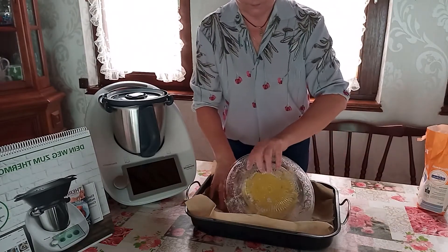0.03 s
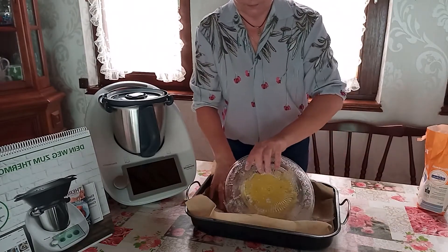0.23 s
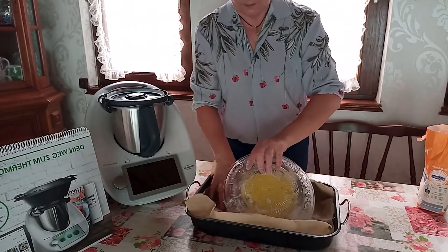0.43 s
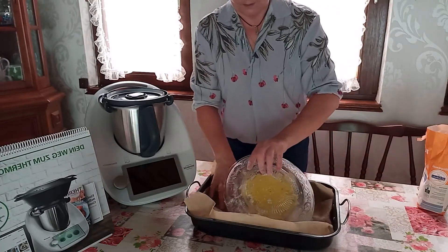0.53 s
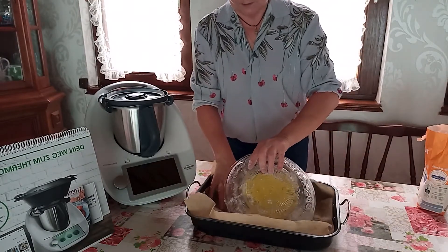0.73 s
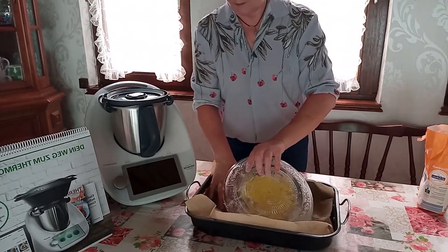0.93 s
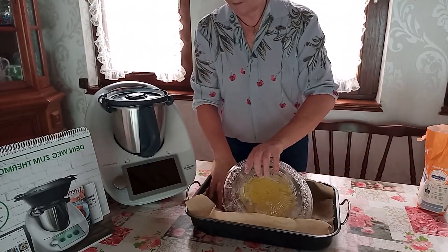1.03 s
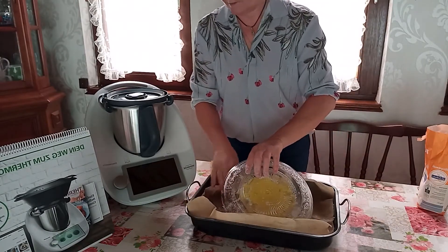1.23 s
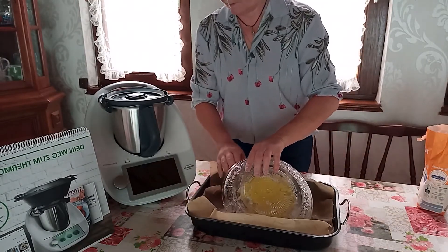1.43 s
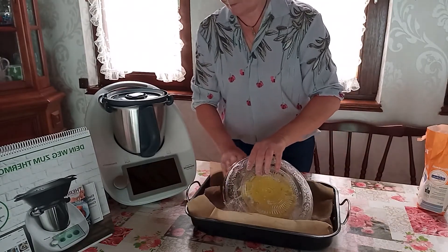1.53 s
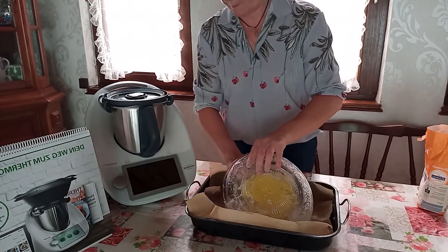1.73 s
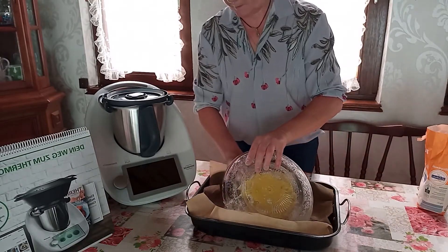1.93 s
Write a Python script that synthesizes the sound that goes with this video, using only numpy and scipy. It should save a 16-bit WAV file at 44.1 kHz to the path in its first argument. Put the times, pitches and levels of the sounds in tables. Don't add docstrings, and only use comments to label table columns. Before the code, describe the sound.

Stiff parchment is shoved and creased in a metal baking tray, loud at first, dying away into light, separate rustles and ticks, with soft low tray nudges, short room echoes and faint appliance hum.

```python
import sys
import numpy as np
from scipy import signal
from scipy.io import wavfile

SR = 44100
rng = np.random.default_rng(int(sys.argv[2]) if len(sys.argv) > 2 else 0)


def transcribe(signal):
    frames = np.atleast_2d(signal).T
    limited = np.clip(frames, -1, 1)
    pcm = np.round(limited * 32767).astype(np.int16)
    wavfile.write(sys.argv[1], SR, pcm)


def volts_from_decibels(level):
    exponent = np.asarray(level, float) / 20
    return 10 ** exponent


N = 88200


def rms_one(x):
    return x / np.sqrt(np.mean(x ** 2) + 1e-20)


def at_hz(points, hz):
    table_hz, value = np.array(points).T
    return np.interp(np.log(hz), np.log(table_hz), value)


def drift(rate_hz):
    r = np.exp(-80 * np.pi * rate_hz / SR)
    noise = rng.standard_normal(N // 40 + 2002)
    slow = signal.lfilter([1], [1, -2 * r, r * r], noise)[2000:]
    return np.interp(np.arange(N) / 40, np.arange(len(slow)), rms_one(slow))


def resonance(x, hz, width_hz):
    r = np.exp(-np.pi * width_hz / SR)
    poles = [1, -2 * r * np.cos(2 * np.pi * hz / SR), r * r]
    return signal.lfilter([(1 - r * r) / 2, 0, (r * r - 1) / 2], poles, x)


def filtered(x, order, hz, kind):
    return signal.sosfilt(signal.butter(order, hz, kind, fs=SR, output="sos"), x)


# (frequency [Hz], left-right correlation)
LIKENESS = [(30, -0.36), (300, 0.7), (1000, 0.47), (2500, 0.15), (6000, -0.19), (14000, 0.067)]
# (frequency [Hz], left minus right [dB])
BALANCE_LR = [(60, 2.5), (380, -2), (2380, -1), (15000, 0.5)]
WEIGHT_BELOW_HZ, CRISP_ABOVE_HZ = 1780, 6100


def bands(source, spectrum, patch_db, weight_db, crisp_db):
    out = 0
    edges_hz = 26 * 2 ** np.arange(0, 9.6, .5)
    for k, (low, high) in enumerate(zip(edges_hz, edges_hz[1:])):
        mid, side = filtered(source[k % 2], 2, [low, high], "band")
        hz = np.sqrt(low * high)
        alike = np.clip(at_hz(LIKENESS, hz), -.9, .99)
        touch_db = weight_db / (1 + (hz / WEIGHT_BELOW_HZ) ** 4)
        touch_db = touch_db + crisp_db / (1 + (CRISP_ABOVE_HZ / hz) ** 4)
        gain = volts_from_decibels(at_hz(spectrum, hz) + patch_db * drift(7.2) + touch_db)
        lean = volts_from_decibels(at_hz(BALANCE_LR, hz) / 2 * np.array([[1], [-1]]))
        stereo = np.sqrt(1 + alike) * mid + np.sqrt(1 - alike) * side * [[1], [-1]]
        out = out + gain * lean * stereo
    return out


CREASES_PER_S, CREASE_SPREAD_DB, CLUMP_DB = 9700, 2.7, 0.47


def creases():
    born = rng.random((2, 2, N)) < CREASES_PER_S / SR
    size_db = CREASE_SPREAD_DB * np.minimum(rng.exponential(1, (2, 2, N)), 5)
    sizes = volts_from_decibels(size_db) * rng.choice([-1, 1], (2, 2, N))
    return rms_one(born * sizes) * volts_from_decibels(CLUMP_DB * (drift(24.5) + drift(160)))


# (time [s], force level [dB], weight on tray [dB], crispness [dB])
PUSHES = [
    [(0.0, -72, 0, -19), (0.04, -79.5, -5, -4), (0.088, -51.5, -10.5, -10.5), (0.13, -43.5, -10, -3.5),
     (0.158, -40, -3, -1), (0.18, -42.5, -1.5, -5.5), (0.195, -41.5, -2, -3.5), (0.235, -46, -2, -2),
     (0.27, -59, -3.5, -6)],
    [(0.308, -52.5, -6.5, -12), (0.316, -44, -4.5, -7), (0.328, -39, -9, -2.5), (0.356, -36, -2.5, -3),
     (0.385, -39.5, -9, -8), (0.41, -40, -3, 0), (0.44, -40, -6.5, -6), (0.466, -49, -4.5, -4)],
    [(0.485, -45, -7, -2), (0.497, -45, -3.5, 3.5), (0.522, -37, -7, -3.5), (0.552, -46.5, -5, -5.5),
     (0.572, -41, -3.5, -5.5), (0.595, -41.5, -7.5, -1.5), (0.615, -49.5, -1.5, -3), (0.64, -53, 0, -9)],
    [(0.655, -46, -3.5, -4), (0.668, -38.5, -7, -3.5), (0.7, -39, -4, -3.5), (0.722, -42, -1.5, -4.5),
     (0.752, -38, -5.5, -4.5), (0.79, -44.5, -4, -3.5), (0.828, -55, -2, -8)],
    [(0.865, -47.5, -3, -3.5), (0.885, -51, -6.5, -6.5), (0.916, -61.5, 1, -3), (0.96, -60, -5.5, -3),
     (1.02, -60, -1.5, -3), (1.06, -65, -1, -5), (1.104, -66.5, -7, -0.5), (1.16, -64, -6.5, -1),
     (1.19, -63.5, -7.5, -8)],
]
# (time [s], force level [dB], weight on tray [dB], crispness [dB])
TUGS = [
    [(1.2, -63.5, -8, -2), (1.206, -59.5, -11, -4.5), (1.243, -60, -4, -7), (1.255, -53, -11, 1),
     (1.29, -59, -11, -1), (1.325, -61, -7.5, -7.5), (1.352, -77, -20, -4), (1.38, -69.5, -23, 2.5),
     (1.414, -69, -4.5, 0.5)],
    [(1.49, -82.5, -13, -3), (1.52, -71.5, -9, 3.5), (1.55, -57.5, -6.5, -11.5), (1.604, -59.5, -5.5, -9),
     (1.638, -55.5, -10, -12), (1.672, -58, -4, -4), (1.703, -66, -11, -13)],
    [(1.712, -60.5, -10, 0), (1.75, -61.5, -16, -5), (1.762, -67, -20, -5), (1.8, -73.5, -25, -2),
     (1.836, -71, -20, -10)],
    [(1.842, -73, -12, -12), (1.866, -59.5, -10, -11), (1.885, -69, -14, -9), (1.91, -71, -8, -9),
     (1.924, -67, -4, -12), (1.954, -63, -15, -12), (1.968, -56, -6, -7), (2.0, -51.5, -16, -11)],
]
# (frequency [Hz], density [dB per Hz])
PAPER = [(60, -17), (280, -6.5), (799, -5.5), (1500, -7.5), (2300, 0.5), (4400, -2.5), (6510, -5.5),
         (12200, -5.5), (15800, -9)]
# (frequency [Hz], width [Hz], level [dB])
BODY = [(602, 73, -5), (816, 230, -8.5), (1140, 356, -7.5), (1580, 26, -50), (2180, 130, -13),
        (5060, 230, -10.5), (12070, 800, -18.5)]
RUSTLE_DB, PATCH_DB = 5.5, 1.0
USUAL_WEIGHT_DB, USUAL_CRISP_DB = -5.5, -3.5


def rustle():
    s, *controls = np.concatenate(PUSHES + TUGS).T
    force_db, weight_db, crisp_db = [np.interp(np.arange(N) / SR, s, c) for c in controls]
    extra_weight_db = np.minimum(weight_db - USUAL_WEIGHT_DB, 5)
    x = bands(creases(), PAPER, PATCH_DB, extra_weight_db, crisp_db - USUAL_CRISP_DB)
    x = x + sum(2 * volts_from_decibels(db) * resonance(x, hz, width_hz) for hz, width_hz, db in BODY)
    level = np.sqrt(volts_from_decibels(force_db + RUSTLE_DB) ** 2 + pop_tail_power())
    return level * rms_one(x)


# (time [s], peak level [dB], pitch [Hz], after-rustle
# [dB])
POPS = [(0.03, -56, 6100, -7), (.084, -35.5, 4520, -9.5), (.163, -32, 790, -26), (.315, -34, 1200, -18),
        (.327, -24, 790, -13.5), (.35, -26.5, 394, -19), (0.356, -26, 1710, -24), (.405, -26, 1200, -33),
        (0.482, -33, 1300, -17), (0.526, -22, 1300, -15), (.566, -31, 734, -20), (0.665, -28, 830, -23),
        (0.689, -26, 1000, -16), (0.741, -29, 2500, -25), (.77, -35, 222, -13.5), (0.844, -41, 315, -10),
        (0.881, -45, 1500, -25), (.995, -43.5, 1150, -8.5), (1.068, -43.5, 910, -14),
        (1.205, -40, 3450, -21), (1.247, -34.5, 4440, -27), (1.255, -33.5, 4650, -17),
        (1.275, -47.5, 680, -6), (1.290, -38.5, 2800, -14), (1.362, -50, 2700, -10),
        (1.374, -47.5, 3000, -8.5), (1.498, -60, 6000, -7), (1.516, -57, 2150, -13), (1.535, -50, 590, -5),
        (1.632, -36, 5400, -14), (1.633, -41, 3900, -13), (1.638, -47, 6000, -20),
        (1.709, -43, 5200, -13.5), (1.710, -49.5, 860, -16), (1.840, -38.5, 5130, -15),
        (1.915, -48, 1290, -11.5), (1.965, -40.5, 2660, -8.5), (1.974, -44, 3300, -17),
        (.145, -33, 4600, -12), (.19, -34, 4400, -13), (.226, -34, 2200, -15), (.39, -27, 4300, -14),
        (.42, -35, 280, -13), (0.676, -32, 3800, -14)]
POP_DB, POP_TICK_DB, POP_BURST_S, POP_WIDTH = -3, -16, .006, .45
TUNED_TAIL_DB, TUNED_TAIL_S, TUNED_TAIL_WIDTH = -3.5, 0.14, 0.34
BROAD_TAIL_DB, POP_TAIL_S = -3, 0.055


def pops():
    out = np.zeros((2, N + SR))
    t = np.arange(6000) / SR
    noise = rng.standard_normal((len(POPS), 3, len(t)))
    for (s, db, hz, after_db), (snap, *fizz) in zip(POPS, noise):
        crack = volts_from_decibels(-60 * t / POP_BURST_S) * snap
        ring = resonance(crack, hz, POP_WIDTH * hz)
        tick = volts_from_decibels(POP_TICK_DB) * np.diff(crack, prepend=0)
        pop = volts_from_decibels(POP_DB) * (ring / np.abs(ring).max() + tick)
        tuned = rms_one(resonance(np.array(fizz), hz, TUNED_TAIL_WIDTH * hz))
        tail = volts_from_decibels(after_db + TUNED_TAIL_DB - 60 * t / TUNED_TAIL_S) * tuned
        start = int(s * SR)
        out[:, start:start + len(t)] += volts_from_decibels(db) * (tail + pop)
    return out[:, :N]


def pop_tail_power():
    t = np.arange(N) / SR
    power = 0
    for s, db, _, after_db in POPS:
        fall_db = 60 * np.maximum(t - s, 0) / (3 * POP_TAIL_S)
        power = power + volts_from_decibels(db + after_db + BROAD_TAIL_DB - fall_db) ** 2 * (t >= s)
    return power


# (time [s], peak level [dB], pitch [Hz], swell [s])
NUDGES = [(0.032, -71, 54, 0.025), (.2, -62, 98, 0.02), (0.259, -64, 52, 0.022), (.28, -67, 134, 0.032),
          (.325, -69, 90, 0.017), (0.358, -56, 160, 0.023), (0.411, -65.5, 101, 0.036),
          (0.457, -57, 137, 0.034), (0.561, -62.5, 139, 0.078), (.59, -61, 58, .018),
          (.65, -65.5, 86, 0.022), (0.72, -63, 96, 0.018), (.78, -67, 120, .02), (.81, -63, 55, 0.02),
          (.87, -71, 125, .03), (1.005, -74, 130, .015), (.89, -67, 52, 0.018), (1.04, -73, 80, .015),
          (1.32, -73, 70.4, 0.025), (1.8, -76, 48, 0.046)]


def nudges():
    t = np.arange(N) / SR
    out = 0
    for s, db, hz, swell_s in NUDGES:
        out = out + volts_from_decibels(db) * np.exp(-((t - s) / swell_s) ** 2) * np.sin(2 * np.pi * hz * (t - s))
    return out


ROOM_T60_S, ROOM_DB, ROOM_CUT_HZ = 0.4, -9.5, 10900


def kitchen(x):
    t = np.arange(SR // 2) / SR
    tail = rng.standard_normal((2, len(t))) * volts_from_decibels(-60 * t / ROOM_T60_S) * (t > .003)
    dull = np.exp(-2 * np.pi * ROOM_CUT_HZ / SR)
    tail = signal.lfilter([1], [1, -dull], tail)
    tail = volts_from_decibels(ROOM_DB) * tail / np.sqrt(np.sum(tail ** 2) / 2)
    return signal.fftconvolve(x, tail, axes=1)[:, :N]


# (frequency [Hz], density [dB per Hz])
AIR = [(15, -36), (25, -3), (228, -10), (350, -5), (520, -5), (834, -9.5), (3490, -35), (13400, -34),
       (15800, -33)]
AIR_DB, AIR_TOP_HZ, AIR_ABOVE_DB = -68.5, 650, -4.5


def room_air():
    air = volts_from_decibels(AIR_DB) * rms_one(bands(rng.standard_normal((2, 2, N)), AIR, 0.48, 0, 0))
    low = filtered(air, 6, AIR_TOP_HZ, "low")
    return low + volts_from_decibels(AIR_ABOVE_DB) * filtered(air, 4, AIR_TOP_HZ, "high")


# (time [s], level [dB])
HUM_SWELL = [(0, 2), (.9, -6), (1.2, 3), (1.55, 4), (1.82, 1), (2, -10)]
HUM_HZ, HUM_WIDTH_HZ, HUM_DB, HUM_STEADY_DB = 345.5, 14, -82, -74.5


def appliance_hum():
    noise = rng.standard_normal(2 * N)
    hum = resonance(resonance(noise, HUM_HZ, HUM_WIDTH_HZ), HUM_HZ, HUM_WIDTH_HZ)[N:]
    t = np.arange(N) / SR
    swell_db = np.interp(t, *np.transpose(HUM_SWELL))
    steady = sum(volts_from_decibels(db) * np.sin(2 * np.pi * hz * t) for hz, db in [(HUM_HZ, 0), (542, -6)])
    return volts_from_decibels(HUM_DB) * rms_one(hum) + volts_from_decibels(HUM_STEADY_DB + 2.2 * drift(8) + swell_db) * steady


PAPER_LOW_HZ = 194


def scene():
    paper = filtered(rustle() + pops(), 3, PAPER_LOW_HZ, "high")
    table = nudges() * volts_from_decibels([[-3.0], [2.5]])
    return paper + kitchen(paper) + table + room_air() + appliance_hum()


def roll_off(x):
    return signal.sosfilt(signal.butter(12, 16600, fs=SR, output="sos"), x)


MIC_LOW_HZ, CUTOFF_HZ = 41, 15750


def record(dry):
    mix = filtered(dry, 2, MIC_LOW_HZ, "high")
    mix = signal.sosfilt(signal.ellip(12, .5, 70, CUTOFF_HZ, fs=SR, output="sos"), mix)
    return roll_off(mix)


dry = scene()
out = record(dry)
transcribe(out)
```